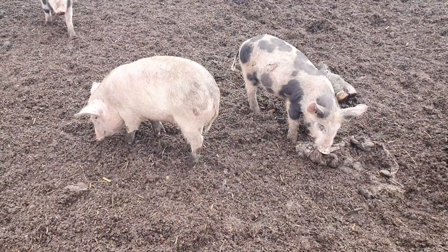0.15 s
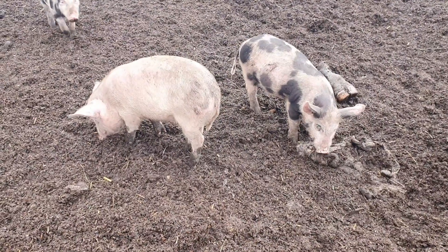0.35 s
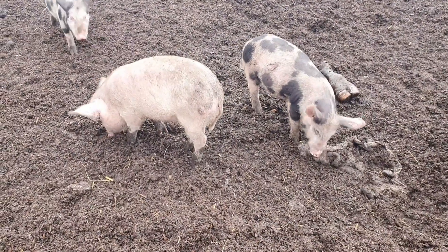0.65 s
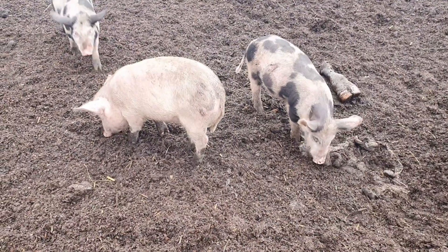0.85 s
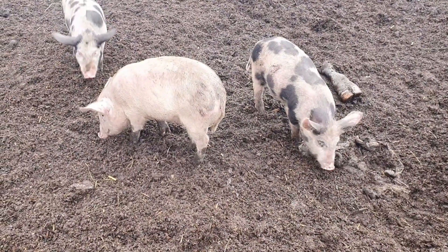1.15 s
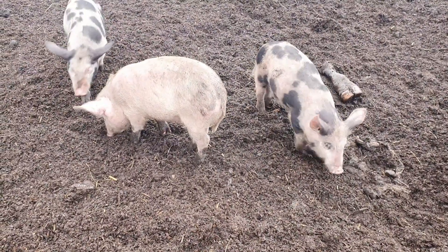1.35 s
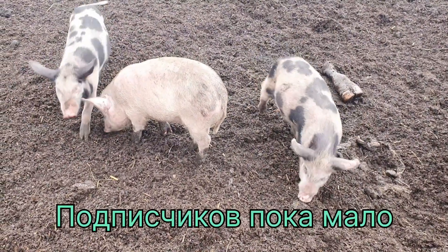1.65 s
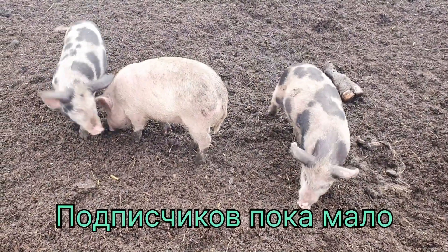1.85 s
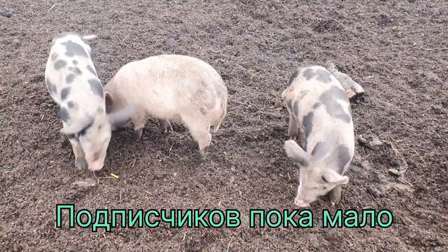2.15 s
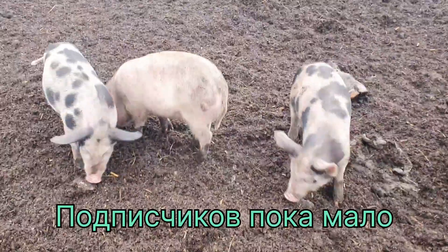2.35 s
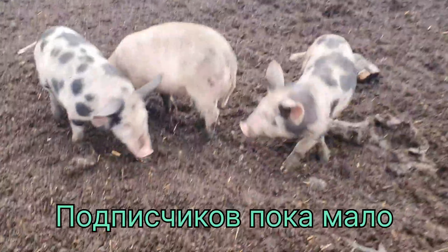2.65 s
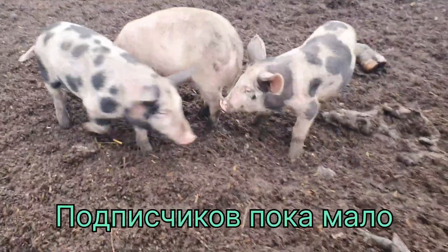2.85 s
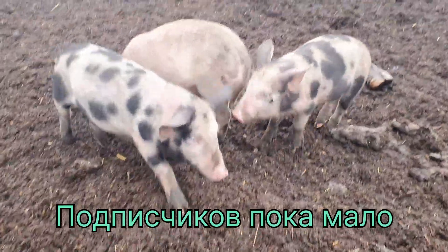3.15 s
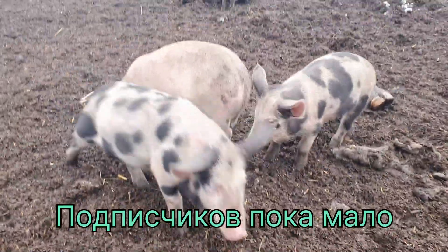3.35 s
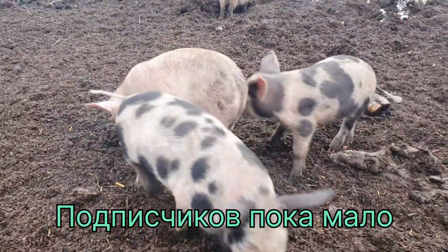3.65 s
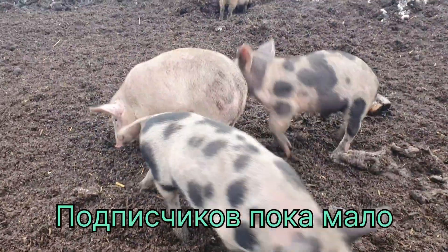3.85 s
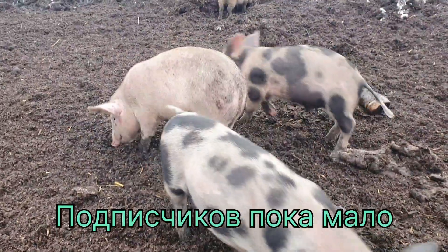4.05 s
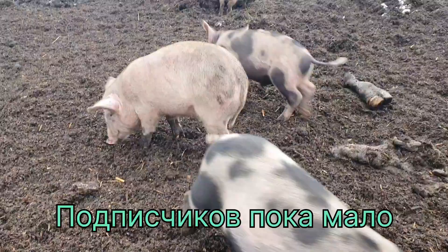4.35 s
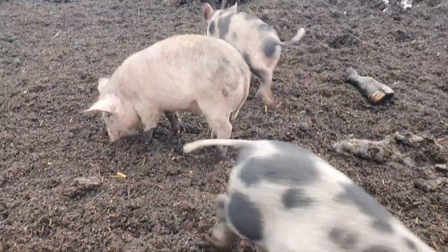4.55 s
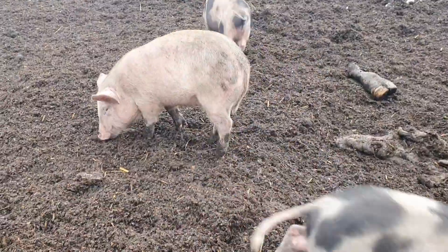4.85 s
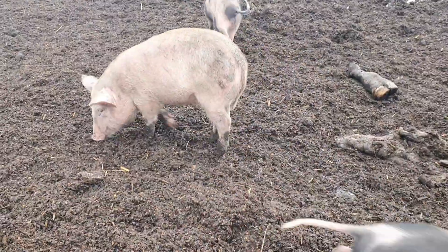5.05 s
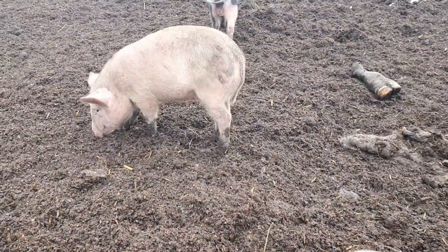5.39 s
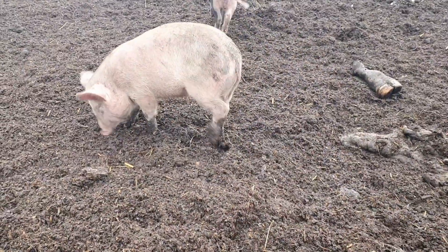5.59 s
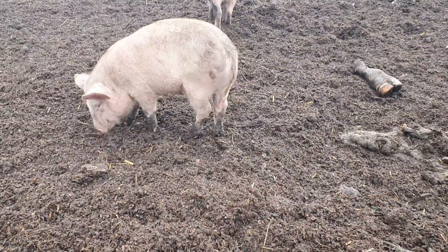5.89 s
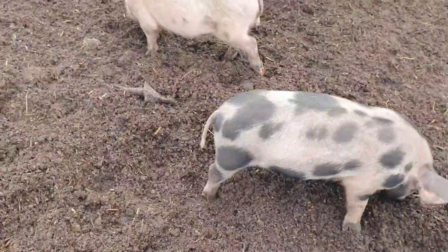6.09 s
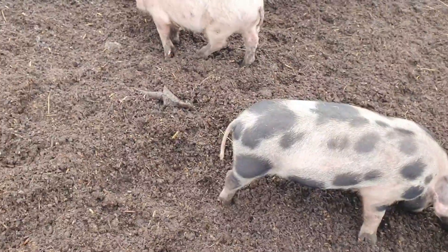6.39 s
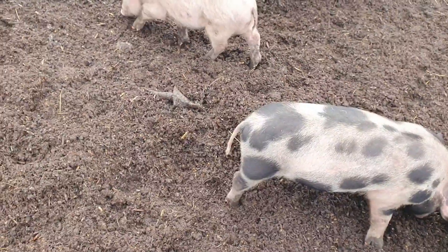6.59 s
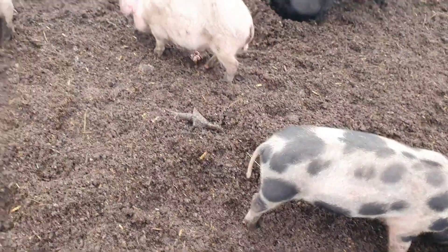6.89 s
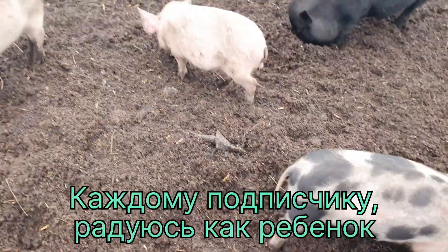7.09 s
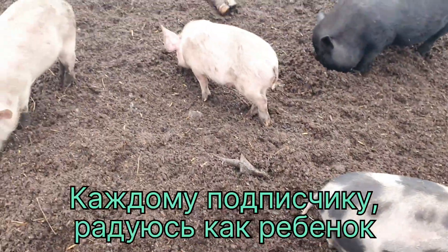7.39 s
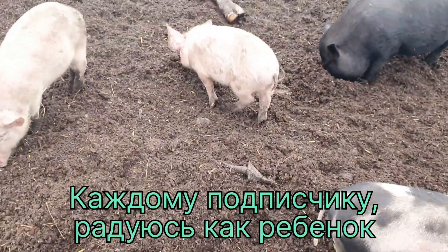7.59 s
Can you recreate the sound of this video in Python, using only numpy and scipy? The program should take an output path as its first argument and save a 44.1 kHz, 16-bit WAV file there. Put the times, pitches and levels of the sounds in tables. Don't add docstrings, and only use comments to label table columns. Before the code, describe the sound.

Open farmyard, close stereo pickup. A few short throaty grunts open the scene among light mud pops and faint bird peeps. After a quieter gap of rustling, a fuller grunt, a sniff and a snort follow while a distant bird trills. Wet smacks grow stronger and denser around five seconds, then clustered grunts end in a long slackening one, a tiny far piglet squeak and rising wind rumble.

```python
import sys
import numpy as np
from scipy import signal
from scipy.io import wavfile

SR = 44100
rng = np.random.default_rng(int(sys.argv[2]) if len(sys.argv) > 2 else 0)


def wav_out(sig):
    wavfile.write(sys.argv[1], SR, np.round(np.clip(np.atleast_2d(sig).T, -1, 1) * 32767).astype(np.int16))


def nominal_scale(level):
    x = np.asarray(level, float) / 20
    return 10 ** x


N = 340893

# ((first slap [s], slap rate
# at start [1/s], at end [1/s], roughness [0-1]), throat, place)
VOICES = [ ((.31, 62, 62, .6), "shut", "left"), ((.639, 40.3, 41, .08), "honk", "left"),
          ((.945, 110, 100, .5), "shut", "right"), ((1.609, 85, 80, .5), "shut", "left"),
          ((3.037, 61.5, 68.5, .05), "open", "right"), ((3.377, 60, 58, .25), "tired", "right"),
          ((3.62, 65, 65, .5), "shut", "right"), ((3.794, 38.5, 36, .04), "snort", "left"),
          ((4.16, 50, 50, .6), "shut", "right"), ((4.63, 125, 88, .4), "rumble", "right"),
          ((5.0, 55, 50, .5), "rumble", "right"), ((5.574, 95, 90, .55), "nasal", "left"),
          ((6.059, 58, 60, .4), "shut", "right"), ((6.321, 62, 62, .1), "bark", "right"),
          ((6.39, 62, 58, .1), "shut", "right"), ((6.57, 38.5, 45, .06), "far", "ahead"),
          ((6.715, 93, 96, .1), "hum", "ahead"), ((6.811, 92, 76, .24), "wide", "ahead"),
          ((6.98, 59.5, 80, .17), "slack", "ahead"), ((7.56, 74, 74, .1), "shut", "ahead"), ]


def rms_one(x):
    return x / np.sqrt(np.mean(x ** 2) + 1e-20)


def in_time(rows):
    s, *columns = np.transpose(rows)
    t = np.arange(round(s[0] * SR), min(round(s[-1] * SR), N)) / SR
    return [t] + [np.interp(t, s, c) for c in columns]


def drift(rate_hz):
    r = np.exp(-80 * np.pi * rate_hz / SR)
    slow = signal.lfilter([1], [1, -2 * r, r * r], rng.standard_normal(N // 40 + 2002))[2000:]
    return np.interp(np.arange(N) / 40, np.arange(len(slow)), rms_one(slow))


def resonance(x, hz, width_hz):
    r = np.exp(-np.pi * width_hz / SR)
    poles = [1, -2 * r * np.cos(2 * np.pi * hz / SR), r * r]
    return signal.lfilter([(1 - r * r) / 2, 0, (r * r - 1) / 2], poles, x)


def double_resonance(x, hz, width_hz):
    return resonance(resonance(x, hz, width_hz), hz, 2 * width_hz)


def cut(x, hz, kind, order=2):
    return signal.sosfilt(signal.butter(order, hz, kind, fs=SR, output="sos"), x)


def add(out, x, start_s, pan_db, lag_ms):
    for port, side in enumerate((1, -1)):
        i = round(start_s * SR + max(side * lag_ms, 0) * SR / 1000)
        piece = x[:max(N - i, 0)]
        out[port, i:i + len(piece)] += piece * nominal_scale(side * pan_db / 2)


def fade(t, edge_s):
    return np.clip(np.minimum(t - t[0], t[-1] - t) / edge_s, 0, 1)


def banded_noise(spectrum, patchy_db, alike):
    hz, level_db = np.transpose(spectrum)
    edges = hz[0] * 2 ** (np.arange(int(3 * np.log2(hz[-1] / hz[0])) + 2) / 3)
    out, together, white = 0, drift(24.0), rng.standard_normal((2, 2, N))
    for k, (low, high) in enumerate(zip(edges, edges[1:])):
        mid, side = cut(white[k % 2], [low, min(high, .45 * SR)], "band")
        band_db = np.interp(np.log(low * high) / 2, np.log(hz), level_db)
        gain = nominal_scale(band_db + patchy_db * (.9 * together + drift(14)))
        out = out + gain * (np.sqrt(1 + alike) * mid + np.sqrt(1 - alike) * side * [[1], [-1]])
    return rms_one(out)


def air():
    # (time [s], gust [dB], stir of the herd [dB])
    gusts = [(0.0, -64.5, -5.5), (0.88, -52.5, -2), (1.5, -66, -6), (2.13, -63, -2), (2.5, -60, 4.5),
             (2.84, -59, 5.5), (3.66, -48.5, 4.5), (4.17, -55, 0), (4.41, -53, -0.5), (4.8, -59.5, -1.5),
             (5.57, -59, -1), (6.09, -55, 0), (6.87, -39.5, -0.5), (7.45, -48.5, -2), (7.73, -34.5, -4)]
    # (frequency [Hz], level [dB per Hz])
    yard_spectrum = [(35, -8), (60, 3), (82, -0.5), (141, -4), (334, -4), (428, -7.5), (1600, -10.5),
                     (2080, -47)]
    # (frequency [Hz], level [dB per Hz])
    rustle_spectrum = [(710, -9.5), (1200, 5.5), (1570, -28.5), (2230, 17.5), (2560, 4.5), (3280, 2),
                       (3730, -1.5), (4920, -1), (7500, -29), (9750, -149)]
    # (frequency [Hz], level [dB per Hz])
    hiss_spectrum = [(3530, -45), (6000, 3.5), (7930, -1.5), (9420, 0), (10800, -16.5), (15100, 16),
                     (16000, -10.5)]
    t, wind_db, stir_db = [np.resize(c, N) for c in in_time(gusts)]
    over_mean_db = wind_db + 45
    rustle_db = -57.5 + 0.72 * stir_db + 0.036 * over_mean_db
    hiss_db = -66.5 + 0.96 * stir_db - 0.092 * over_mean_db
    yard_db = -55.5 + 0.92 * stir_db + 0.071 * over_mean_db

    shared, *own = rng.standard_normal((3, N))
    wind = cut(.4 * shared + np.array(own), 70, "low", order=4)
    wind = rms_one(cut(wind, 42, "high", order=4))
    wind = wind * nominal_scale(2.5 * drift(5.0)) * nominal_scale(np.array([[1.5], [-1.5]]))

    falls = rng.random((2, N)) < 130 / SR
    strength_db = 4.5 * np.minimum(rng.exponential(1, (2, N)), 3)
    grains = falls * nominal_scale(strength_db) * rng.choice([-1, 1], (2, N))
    dealt = np.cumsum(grains != 0, axis=1) % 7
    crackle = rms_one(sum(resonance(grains * (dealt == k) + 1e-18, hz, .16 * hz)
                          for k, hz in enumerate(np.geomspace(1900, 5200, 7))))

    yard = banded_noise(yard_spectrum, patchy_db=1.5, alike=.6)
    yard[0] = np.roll(yard[0], round(.0004 * SR))
    rustle = banded_noise(rustle_spectrum, patchy_db=1.4, alike=.01) + nominal_scale(-8.0) * crackle
    hiss = banded_noise(hiss_spectrum, patchy_db=1.1, alike=.01)
    return nominal_scale(wind_db) * wind + nominal_scale(yard_db) * yard + nominal_scale(rustle_db) * rustle + nominal_scale(hiss_db) * hiss


def songs():
    # (start [s], length [s], from
    # [Hz], to [Hz], level [dB])
    peep_calls = [(0.174, 0.14, 3000, 2930, -62.5), (0.356, 0.1, 3300, 2970, -61.5),
                  (1.06, 0.096, 2300, 2180, -75), (1.536, 0.11, 2410, 2010, -70),
                  (0.057, 0.27, 2420, 2315, -72), (0.969, .08, 3010, 2890, -71),
                  (1.2, 0.14, 2240, 2120, -76), (1.432, 0.043, 2630, 2800, -57),
                  (1.558, 0.097, 4300, 4170, -68), (1.702, 0.031, 1390, 1364, -51.5),
                  (4.258, 0.12, 2250, 2215, -60.5), (4.94, .17, 3760, 3700, -58),
                  (5.587, 0.052, 10500, 10560, -62), (5.823, .06, 10250, 10300, -68),
                  (2.083, 0.059, 6920, 6680, -60), (3.23, 0.052, 8550, 8400, -63),
                  (3.557, 0.084, 2754, 2673, -56), (4.136, 0.13, 2700, 2300, -62.5),
                  (4.502, 0.18, 2736, 2530, -62.5), (5.46, 0.087, 2220, 2160, -66)]
    # (time [s], frequency [Hz], level [dB])
    hook = [(0, 4060, 6), (.016, 3103, 5), (.028, 2545, -6), (.038, 2235, 0), (.052, 2226, -1),
            (.078, 2605, -7.5), (.15, 2584, -8), (.2, 2570, -16)]
    # (time [s], level [dB])
    hook_calls = [
        (5.515, -45.5),
        (5.775, -46),
    ]
    # (time [s], frequency [Hz], level [dB])
    chirp = [(6.155, 3064, -37), (6.168, 2420, -56), (6.185, 2450, -52.5), (6.215, 3096, -35.5),
             (6.234, 2917, -77), (6.24, 3530, -44), (6.25, 2830, -45), (6.272, 2407, -49),
             (6.32, 2340, -56)]
    edge_db, glide_left = 5, .35
    peeps = []
    for s, length, from_hz, to_hz, db in peep_calls:
        middle_hz = to_hz + glide_left * (from_hz - to_hz)
        peeps.append([(s, from_hz, db - edge_db), (s + length / 2, middle_hz, db),
                      (s + length, to_hz, db - edge_db)])
    return peeps + [np.add(hook, (s, 0, db)) for s, db in hook_calls] + [chirp]


def whistles(lag, tail):
    out, flutter = np.zeros((2, N + SR)), drift(60)
    for rows in songs():
        t, hz, level_db = in_time(rows)
        phase = 2 * np.pi * np.cumsum(hz) / SR
        faint = level_db.max() < -55
        tone = np.sin(phase + (.8 + .6 * faint) * flutter[-len(t):])
        i = round(t[0] * SR)
        waver_db = (2.5 + 2.5 * faint) * flutter[i:i + len(t)]
        tone = np.sqrt(2) * nominal_scale(level_db + waver_db) * fade(t, .006) * tone
        add(out, tone, t[0], -5.0, .4)
        echo = signal.fftconvolve(tone[None], rng.standard_normal((2, len(lag))) * tail, axes=1)
        out[:, i:i + echo.shape[1]] += nominal_scale(-41 if faint else -35) * echo
    return out[:, :N]


def trill(lag, tail):
    # (time [s], level [dB], sweeps start at [Hz])
    sweeps = [
        (3.6, -55.5, 4100),
        (3.95, -52.5, 3890),
        (4.35, -52.5, 3204),
        (4.75, -57.5, 3720),
    ]
    start_s, per_s, slows, top_hz = 3.635, 19.05, 1.45, 5850
    t, level_db, from_hz = in_time(sweeps)
    since = t - start_s
    cycle = np.maximum(since, 0) * (per_s - slows * since ** 2) % 1
    along = np.clip(cycle / .52, 0, 1)
    rasp_db = 3 * drift(200)[:len(t)]
    hz = from_hz + (top_hz - from_hz) * along + 210 * drift(300)[:len(t)]
    voice = np.sin(np.pi * along) * np.sin(2 * np.pi * np.cumsum(hz) / SR)
    direct = np.zeros((2, N))
    add(direct, nominal_scale(level_db + 6.5 + rasp_db) * voice, t[0], 2.5, .45)
    echoes = rng.standard_normal((2, len(lag))) * tail
    return .68 * direct + nominal_scale(-34) * signal.fftconvolve(direct, echoes, axes=1)[:, :N]


def birds():
    lag = np.arange(round(.4 * SR)) / SR
    tail = np.exp(-lag / .08) * (lag > .006)
    return whistles(lag, tail) + trill(lag, tail)


def ticks():
    # (time [s], peak [dB],
    # ring [Hz])
    cracks = [(0.196, -48, 4630), (0.5794, -53, 5310), (1.0201, -55, 4240), (1.053, -53, 3290),
              (1.0694, -56, 4300), (1.1528, -49, 6570), (1.2994, -61, 3640), (1.447, -44, 4230),
              (1.5444, -56, 4230), (1.6975, -47, 3340), (1.8985, -48, 4220), (1.96, -43, 3240),
              (2.0732, -60, 4680), (2.2094, -53, 3250), (2.6559, -53, 3770), (3.0949, -49, 4110),
              (3.124, -47, 4130), (3.2301, -36.5, 4120), (3.4251, -55, 4110), (3.905, -32, 3740),
              (3.9233, -32.5, 4300), (4.782, -48, 4050), (4.8553, -32, 4940), (4.9791, -43, 3970),
              (5.045, -49, 3670), (5.0694, -49, 3680), (5.1402, -49, 4010), (5.216, -39, 4120),
              (5.235, -41, 4100), (5.252, -37, 3600), (5.5494, -39, 3700), (5.6694, -44, 3950),
              (5.713, -40, 5500), (5.73, -34, 5400), (5.9794, -46, 3600), (6.1419, -47, 4150),
              (6.1669, -47, 4240), (6.9167, -34, 5070), (7.2894, -57, 3390)]
    # (time [s], peak [dB], ring [Hz])
    clods = [(0.9617, -51, 1960), (0.9797, -48, 1960), (1.2644, -55, 2610), (2.6694, -45, 2470),
             (3.937, -33, 2850), (4.0297, -50, 1960), (4.1433, -34.5, 3000), (4.511, -41.5, 2360),
             (4.7257, -37, 2400), (5.1123, -46, 2970), (5.191, -34.5, 2280), (5.233, -36, 3060),
             (5.3242, -23, 2630)]
    out, t = np.zeros((2, N)), np.arange(round(.025 * SR)) / SR
    rows = cracks + clods
    for (s, peak_db, hz), noise in zip(rows, rng.standard_normal((len(rows), len(t)))):
        burst = noise * (1 - np.exp(-t / .002)) * np.exp(-t / .004)
        ring = double_resonance(burst, hz, .2 * hz)
        add(out, nominal_scale(peak_db - 2.0) * ring / np.abs(ring).max(), s, 1.5, .5)
    return out


def mud():
    # (time [s], peak [dB], ring [Hz])
    pops = [(0.164, -41, 2640), (.2498, -45, 2680), (.33, -45.5, 2540), (0.4747, -40.5, 2800),
            (0.8933, -34.5, 2800), (1.179, -44, 2540), (1.288, -46.5, 2550), (1.422, -41.5, 2470),
            (1.606, -46, 496), (1.6886, -50.5, 1870), (1.765, -46.5, 2240), (1.935, -33.5, 2490),
            (1.935, -30, 860), (2.721, -23.5, 2300), (3.2281, -28, 2330), (3.317, -39, 2480),
            (3.332, -47, 2700), (3.345, -38, 2580), (3.36, -46, 2600), (3.375, -38, 2710),
            (3.8619, -25.5, 1340), (3.905, -25, 2300), (4.24, -27, 2090), (4.628, -38, 5600),
            (4.744, -29, 2300), (4.763, -31, 2450), (4.78, -22, 1720), (4.808, -24.5, 2140),
            (5.1106, -34.5, 2940), (5.3, -34.5, 300), (5.3172, -29, 2300), (6.0533, -39.5, 5550),
            (6.685, -35.5, 2260), (6.9178, -24.5, 1350), (7.419, -35, 1080)]
    # (time [s], peak [dB], ring [Hz])
    splats = [(0.556, -49, 2340), (1.373, -44.5, 2760), (1.4592, -41.5, 3020), (1.8622, -45.5, 3280),
              (1.88, -52, 4460), (2.2972, -41.5, 2500), (2.89, -48, 2380), (2.9, -40, 2300),
              (2.917, -40.5, 2300), (2.9614, -41.5, 2480), (2.9945, -45, 1710), (4.7047, -41.5, 2400),
              (4.8492, -37, 2180), (5.019, -46, 4440), (5.043, -44.5, 4330), (5.1901, -30.5, 4670),
              (5.251, -42, 2130), (5.299, -27, 2030), (5.3078, -25.5, 2260), (5.3442, -29, 5460),
              (5.3873, -39.5, 5300), (5.625, -30.5, 2780), (5.6504, -39.5, 2800), (5.7123, -34, 4440),
              (5.73, -29.5, 4300), (5.9474, -37, 2880), (6.3305, -37, 3160)]
    out, t = np.zeros((2, N)), np.arange(round(0.042 * SR)) / SR
    # spray of a medium smack [dB], share of the smack's strength that the spray follows
    smacks = [row + (-64.5, 0.7) for row in pops] + [row + (-51, 0.94) for row in splats]
    for s, peak_db, hz, spray_db, follows in sorted(smacks):
        noise = rng.standard_normal((3, len(t)))
        decay = np.exp(-t / .0028) + .08 * np.exp(-t / .012)
        burst = noise[0] * (1 - np.exp(-t / .003)) * decay
        pocket = sum(share * double_resonance(burst, ratio * hz, width_hz)
                     for ratio, width_hz, share in ((0.986, 427, 0.86), (1.7, 520, 0.055), (0.43, 1170, 0.22)))
        add(out, nominal_scale(peak_db + 1.5) * pocket / np.abs(pocket).max(), s, 2.5, .5)
        puff = noise[1:] * .5 * np.exp(-((t - .008) / .006) ** 2)
        spray = cut(puff, [3000, rng.uniform(8000, 16000)], "band")
        i = round(s * SR)
        out[:, i:i + len(t)] += nominal_scale(spray_db + follows * (peak_db + 36.5) + 11.0) * spray
    return out


def short_swell(t, start, peak, end, late_s=0):
    return [np.clip((t - peak - late_s) / (edge - peak - late_s / 2), 0, 1) ** 1.33 for edge in (start, end)]


def swells():
    # (start [s], peak [s], end [s], chest
    # [dB], throat [dB])
    short_grunts = [(0.298, 0.424, .5, -46, -53), (0.618, 0.71, .82, -31, -36),
                    (0.922, 0.976, 1.07, -36, -48), (1.599, 1.73, 1.88, -40.5, -55.5),
                    (3.612, 3.718, 3.78, -61, -60), (3.781, 3.875, 3.955, -33.5, -39),
                    (4.155, 4.196, 4.35, -56, -53.5), (4.624, 4.756, 4.83, -30.5, -41),
                    (4.984, 5.056, 5.28, -43, -47), (5.565, 5.644, 5.73, -32, -37.5),
                    (6.04, 6.154, 6.2, -42, -48), (6.302, 6.365, 6.385, -32.5, -28.5),
                    (6.38, 6.388, 6.5, -41, -67), (6.55, 6.68, 6.76, -51, -50),
                    (6.706, 6.75, 6.82, -53, -51), (7.556, 7.65, 7.73, -64, -61)]
    swell_depths = {"shut": (27, 23, 16.5, 17, -7.5), "honk": (15, 41, 6.3, 23.5, 10),
                    "nasal": (31, 15, 18.5, 23.5, -2.5), "bark": (22, 13, 20, 15, -22),
                    "far": (-7, -2, 6.5, 6, -4), "rumble": (30, 19, 14, 11.5, -13),
                    "snort": (16.5, 4, 12, 6.5, -1), "hum": (6, 2, 4, 8, -30)}
    # (time [s], effort [dB], mouth opening as snout over throat [dB])
    long_grunts = [
        [(3.025, -78, -12), (3.041, -37, -19), (3.115, -25, -19.5), (3.211, -25.5, -5.5), (3.37, -28, -13.5),
         (3.493, -39, -17), (3.505, -27.5, -15.5), (3.6, -71, 17)],
        [(6.79, -50, -15), (6.815, -48, -25), (6.835, -34.5, -5), (6.872, -28.5, -4), (6.96, -31.5, 4.5),
         (7.05, -34, -4.5), (7.218, -43, -14), (7.306, -49.5, -14), (7.345, -61, -6)],
    ]
    # (voice breaks at [s], chest at full effort [dB])
    breaks = [
        (3.37, -37),
        (6.97, -34),
    ]
    throats, tables = [throat for _, throat, _ in VOICES if throat in swell_depths], []
    for (start, peak, end, chest_db, head_db), throat in zip(short_grunts, throats):
        rise, fall, head_rise, head_fall, snout = swell_depths[throat]
        t = np.arange(start, end, .002)
        before, after = short_swell(t, start, peak, end)
        head = head_db - head_rise * before - head_fall * after
        before, after = short_swell(t, start, peak, end, late_s=0.016)
        tables.append(np.c_[t, chest_db - rise * before - fall * after, head, head + snout])
    for rows, (break_s, chest_db) in zip(long_grunts, breaks):
        t, effort, opening = in_time(rows)
        late_effort = np.interp(t - 0.031, t, effort)
        chest = chest_db + 0.7 * (late_effort + 32.5)
        whole = np.c_[t, chest, effort, effort + opening]
        tables += [whole[t < break_s + .008], whole[t > break_s - .008]]
    return sorted(tables, key=lambda rows: rows[0, 0])


def grunt(rows, voice, throat):
    throat_rings = { "open": [(250, 90, -17), (490, 120, -5.5), (810, 140, 0), (1350, 220, 0),
                    (1600, 170, -5), (2700, 600, -35)], "tired": [(260, 100, -13), (490, 120, -3),
                    (800, 190, 0), (1200, 260, 0), (1500, 200, -8)], "bark": [(426, 107, -11.5),
                    (737, 204, -6), (1350, 180, 0)], "honk": [(260, 80, -3), (522, 60, -12), (834, 100, 0),
                    (1180, 170, 0), (1670, 110, -7), (2120, 200, -20), (2850, 300, -26), (3400, 350, -35),
                    (4100, 500, -42)], "snort": [(190, 90, -6), (285, 80, 0), (460, 110, -3),
                    (1270, 300, 0), (1630, 150, -2), (2050, 300, -8)], "rumble": [(175, 93, -1.5),
                    (311, 96, -1.5), (520, 224, -9), (1100, 330, 0)], "hum": [(285, 50, 0), (1100, 300, 0)],
                    "nasal": [(156, 65, -1), (289, 76, -1), (483, 140, -5), (770, 210, -10.5),
                    (1230, 810, 16), (2300, 19, 12)], "shut": [(299, 76, -1), (590, 310, -12.5),
                    (1080, 270, 0)], "far": [(270, 70, -3), (530, 60, -7), (680, 60, 0), (850, 60, -12),
                    (1170, 75, 0)], "wide": [(540, 130, -1), (820, 190, 0), (1400, 260, 0), (1920, 240, -3),
                    (2480, 350, -9), (2950, 400, -14), (3450, 400, -25), (3850, 350, -28)],
                    "slack": [(246, 130, -8), (407, 120, -5), (531, 70, 0), (740, 200, -1.5),
                    (1416, 200, -1), (1730, 230, -19)], }
    closing = {"open": (3.5, .06, .1), "tired": (1.0, .05, .08), "wide": (3.0, .2, .2),
               "slack": (.5, .04, .24), "honk": (2.0, .04, .1), "far": (-5.0, .02, .02)}
    clean_flutter = {"snort": .03, "far": .04, "hum": .04, "honk": .075, "open": .05, "tired": .09}
    snout_from_hz = 1050
    first_s, rate0, rate1, rough = voice
    t, chest_db, throat_db, snout_db = in_time(rows)

    rate = np.interp(t, [first_s, t[-1]], [rate0, rate1])
    cycles = np.cumsum(rate * (t >= first_s)) / SR
    at = np.searchsorted(cycles, np.arange(1e-9, cycles[-1]))
    luck, noise = rng.standard_normal((40, 2))[:len(at)], rng.standard_normal(SR // 2)[:len(t)]
    jitter = (.2 * rough * luck[:, 0] * SR / rate0).astype(int)
    at = np.clip(at + jitter, 0, len(t) - 1)
    slaps = np.full(len(t), 1e-12)
    slaps[at] = nominal_scale(6 * rough * luck[:, 1])

    puff_n = round(.06 * SR)
    puff_shape = signal.windows.tukey(puff_n, .05) * np.exp(-np.arange(puff_n) * rate0 / (.15 * SR))
    puff = np.convolve(slaps, puff_shape)[:len(t)] + .5 * rough ** 2
    closing_db, *leak = closing.get(throat, (0, 0, 0))
    along = np.linspace(0, 1, len(t))
    puff = puff + np.interp(along, [0, 1], np.abs(leak))
    source = slaps + clean_flutter.get(throat, .12 + .12 * rough) * puff * noise

    colour = nominal_scale(1.36 * rng.standard_normal((41, 9)))[np.cumsum(slaps > 1e-9)]
    rings = []
    for k, (hz, width_hz, db) in enumerate(throat_rings[throat]):
        mouth_db = closing_db * np.log2(hz / 600) * (2 * along - 1.5)
        ring = double_resonance(source * colour[:, k], hz, width_hz)
        rings.append((hz, (-1) ** k * nominal_scale(db - mouth_db) * ring))
    low = rms_one(sum(x for hz, x in rings if hz < snout_from_hz))
    effort_db = throat_db - throat_db.max()
    high = rms_one(sum(x * nominal_scale(.9 * np.log2(hz / snout_from_hz) * effort_db)
                       for hz, x in rings if hz > snout_from_hz))

    chest = resonance(resonance(slaps, 76, 30), 80, 110) + .15 * resonance(slaps, 185, 80)
    chest = rms_one(cut(chest, [46, 240], "band"))
    head = nominal_scale(throat_db) * low + nominal_scale(snout_db) * high
    return fade(t, 0.018) * nominal_scale(chest_db) * chest, fade(t, 0.0067) * head


def sniff(out):
    # (start [s], end [s], level [dB])
    start_s, end_s, level_db = (3.55, 3.79, -56)
    t = np.arange(start_s, end_s, 1 / SR)
    patches = nominal_scale(3 * drift(15)[:len(t)])
    breath = cut(rng.standard_normal(SR // 2)[:len(t)], 4500, "high")
    add(out, nominal_scale(level_db) * fade(t, .09) * patches * breath, t[0], 1.5, 0)


def squeak(out):
    # (time [s], frequency [Hz], tone [dB], octave [dB])
    piglet = [
        (7.44, 457, -76, -66),
        (7.48, 480, -52.5, -50),
        (7.55, 465, -66, -78),
    ]
    t, hz, low_db, octave_db = in_time(piglet)
    phase = 2 * np.pi * np.cumsum(hz) / SR
    tone = nominal_scale(low_db) * np.sin(phase) + nominal_scale(octave_db) * np.sin(2 * phase)
    add(out, np.sqrt(2) * fade(t, 0.0072) * tone, t[0], -3.7, -.3)


def pigs():
    places = {"left": (-.37, 1.5), "right": (.4, .5), "ahead": (.2, 7)}
    out = np.zeros((2, N))
    for rows, (voice, throat, place) in zip(swells(), VOICES):
        chest, head = grunt(rows, voice, throat)
        lag_ms, chest_pan_db = places[place]
        add(out, chest, rows[0][0], chest_pan_db, 1.64 * lag_ms)
        add(out, head, rows[0][0], -7.0 * lag_ms, lag_ms)
    sniff(out)
    squeak(out)
    lag = np.arange(round(.12 * SR)) / SR
    echoes = cut(rng.standard_normal((2, len(lag))), 2500, "low") * np.exp(-lag / .025) * (lag > .003)
    return out + nominal_scale(-42) * signal.fftconvolve(out, echoes, axes=1)[:, :N]


def scene():
    return air() + birds() + ticks() + mud() + pigs()


def band_limit(x):
    return signal.sosfilt(signal.butter(12, 16300, fs=SR, output="sos"), x)


def record(dry):
    top = signal.cheby2(12, 60, 16450, fs=SR, output="sos")
    return band_limit(signal.sosfilt(top, dry))


dry = scene()
out = record(dry)
wav_out(out)
```